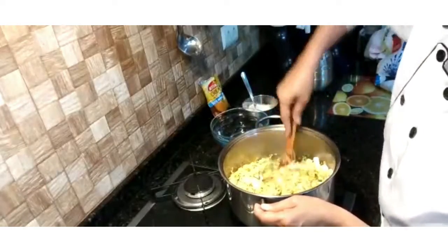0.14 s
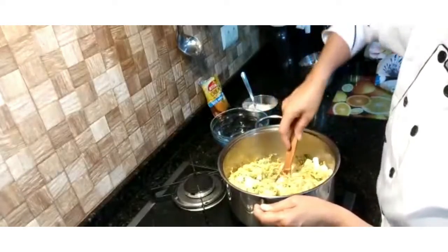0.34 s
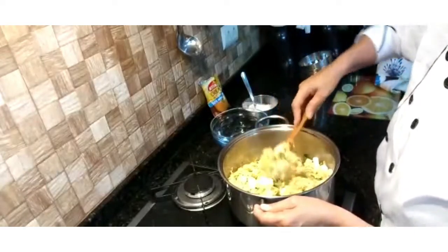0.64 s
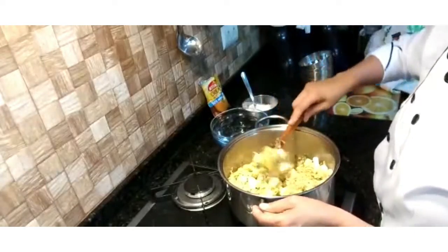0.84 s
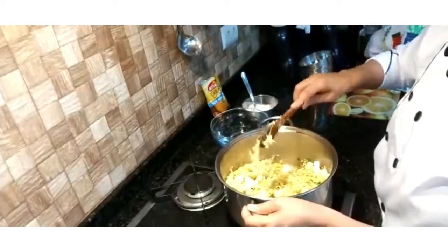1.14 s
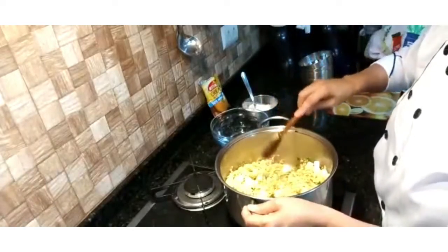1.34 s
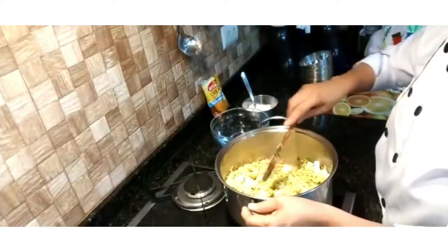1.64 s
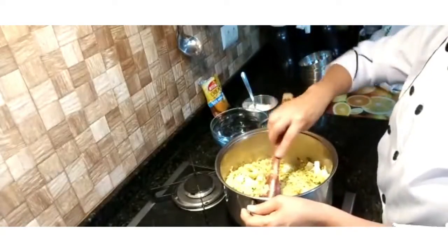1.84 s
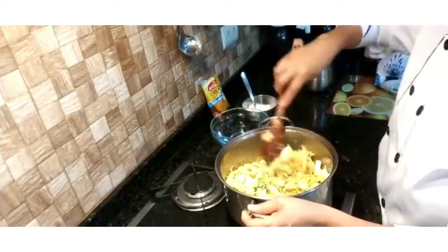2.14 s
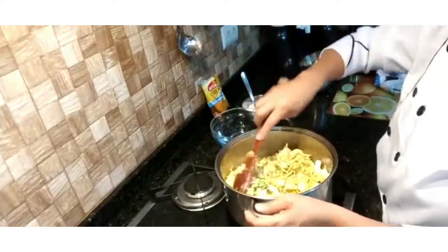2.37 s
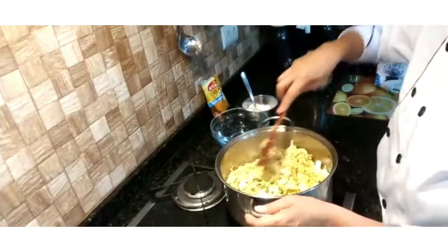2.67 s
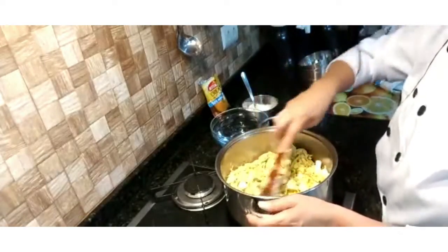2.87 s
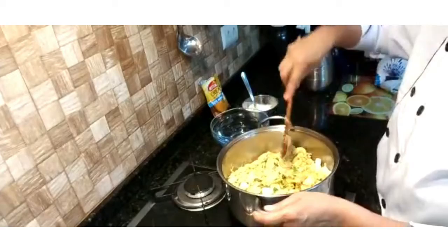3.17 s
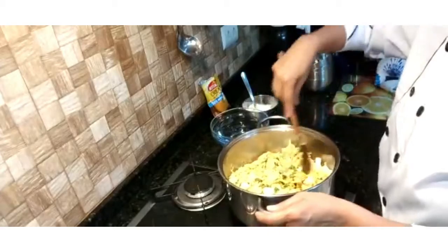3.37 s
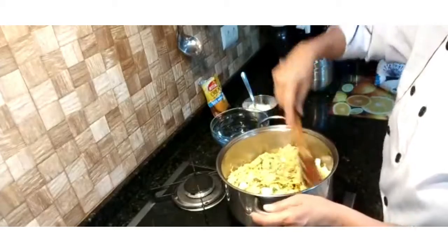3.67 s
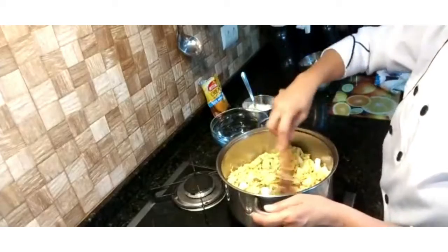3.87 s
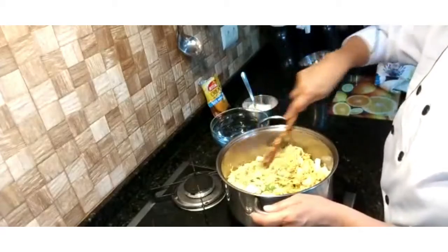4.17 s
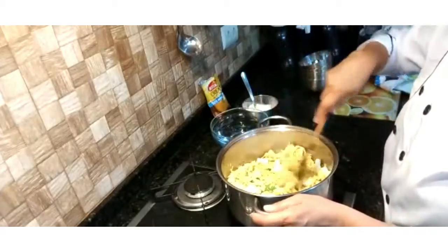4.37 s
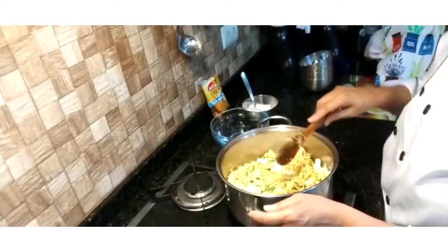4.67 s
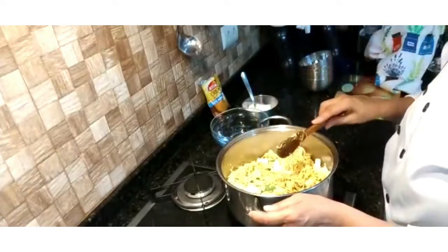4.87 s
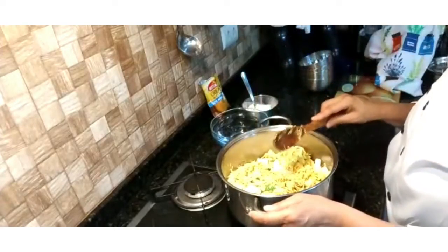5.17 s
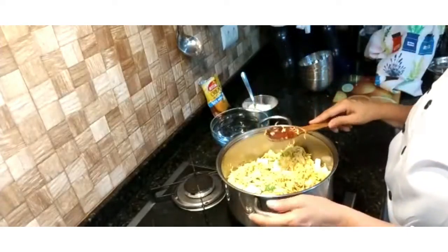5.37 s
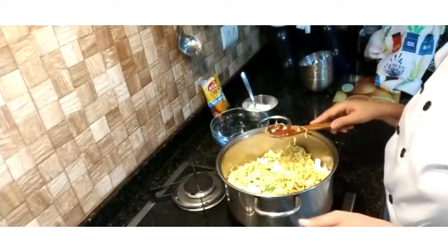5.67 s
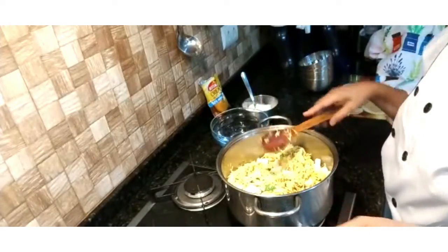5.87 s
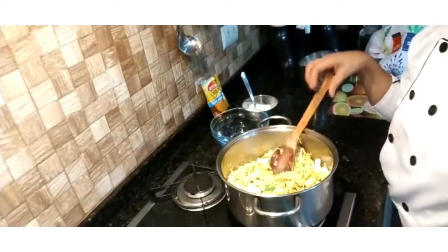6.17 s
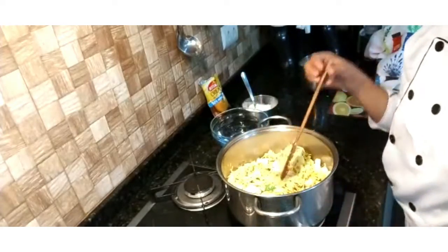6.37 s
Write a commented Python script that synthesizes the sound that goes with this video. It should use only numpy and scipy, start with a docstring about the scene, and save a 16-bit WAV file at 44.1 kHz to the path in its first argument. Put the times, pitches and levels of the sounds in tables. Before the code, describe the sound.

Close, slightly dull sound of cooking: soft squelch and a small tick at first, a pause, then solid damped knocks of wood on a heavy pot, spaced unevenly. Food crackles wetly and drops in soft lumps mid-way, another sharp knock rings briefly, then taps, and the end is quiet stirring over thin hiss with short room reverberation.

```python
"""A tiled kitchen, close to the stove: a wooden spoon turns food in a steel pot that a hand holds steady.
The spoon knocks on the wall: damped modes, a noise crack and a short clack ring in six bands.
Between knocks the food squelches and tumbles, made of coloured random grains and short noise pops.
Behind lie a faint sizzle of shaped noise with the hollow of the pot, and a low rumble of air."""
import sys
import numpy as np
from scipy import signal
from scipy.fft import rfft, irfft, next_fast_len
from scipy.io import wavfile
from scipy.ndimage import uniform_filter1d

SR = 44100
rng = np.random.default_rng(int(sys.argv[2]) if len(sys.argv) > 2 else 0)


def put_to_file(sound):
    """Save the sound as 16-bit audio at rate SR, in the file named by the first command-line argument."""
    columns = np.atleast_2d(sound).T  # one column per channel
    safe = np.clip(columns, -1, 1)
    whole_steps = np.round(safe * 32767)
    wavfile.write(sys.argv[1], SR, whole_steps.astype(np.int16))


N = 287644

# families of modes, in the order thump, base, wall, spoon, rim, tick: lowest f/Hz, highest f/Hz
MODE_FAMILIES = [(100, 440), (430, 790), (1010, 1690), (1690, 2750), (2850, 5200), (5200, 8600)]


def amp(db):
    """Decibels to gain."""
    return 10 ** (np.asarray(db) / 20)


def unit(x):
    """x at rms 1."""
    return x / np.sqrt(np.mean(x ** 2) + 1e-20)


def along(points, hz):
    """(f/Hz, value) points read on a logarithmic frequency axis."""
    f, value = np.transpose(points)
    return np.interp(np.log(hz + 1), np.log(f + 1), value)


def filtered(x, response):
    """x times a response of frequency."""
    m = next_fast_len(len(x) + SR // 2)
    gain = response(np.fft.rfftfreq(m, 1 / SR))
    return irfft(rfft(x, m) * gain, m)[:len(x)]


def coloured(x, spectrum):
    """x shaped by a spectrum of relative levels, at rms 1."""
    return unit(filtered(x, lambda hz: amp(along(spectrum, hz))))


def evened(x, width_hz):
    """A decaying burst with its chance peaks and dips of colour levelled out."""
    m = 2 * len(x)
    z = rfft(x, m)
    bins = max(int(width_hz * m / SR), 1)
    power = np.abs(uniform_filter1d(np.abs(z) ** 2, bins))
    return irfft(z / np.sqrt(power + 1e-12), m)[:len(x)] * np.linalg.norm(x)


def swell(middle_s, half_s):
    """A smooth bell-shaped rise and fall around a moment."""
    t = np.arange(N) / SR
    return np.exp(-((t - middle_s) / half_s) ** 2)


def grains(rate, spread_db):
    """Single-sample random impulses of uneven size, on average rate a second, at rms 1."""
    sizes = rng.standard_normal(N) * amp(spread_db * rng.standard_normal(N))
    present = rng.random(N) < rate / SR
    return unit(present * sizes)


def add(track, s, sound):
    """Mix a sound in at time s."""
    part = track[max(round(s * SR), 0):][:len(sound)]
    part += sound[:len(part)]


def kitchen(wall_db, tail_db):
    """Room response: the direct sound, quick echoes from pot and tiles, a diffuse tail."""
    # decay of the tail: f/Hz, t60/s
    decay = [(120, 0.34), (300, 0.57), (700, 0.34), (1800, 0.32), (4000, 0.31), (8000, 0.23)]
    hz, t, z = signal.stft(rng.standard_normal(SR // 2), SR, nperseg=256)
    fade_db = -60 * t / along(decay, hz)[:, None]
    tail = signal.istft(z * amp(fade_db), SR)[1][:SR // 2]
    t = np.arange(len(tail)) / SR
    tail = tail * (1 - np.exp(-t / 0.0016))  # the tail builds up behind the first echoes
    near = rng.standard_normal(len(t)) * (t / 0.002) * np.exp(-t / 0.0026)
    direct = t == 0
    return direct + amp(wall_db) * near / np.linalg.norm(near) + amp(tail_db) * tail / np.linalg.norm(tail)


def air(rumble_db=-49.0, draught_db=-38.5):
    """A low rumble of air around the stove, as low noise; one draught brushes the microphone."""
    # steady rumble: f/Hz, relative level/dB
    rumble_spectrum = [(12, 4), (25, -6), (45, -7), (70, -14.5), (130, -17), (200, -25), (320, -24.5),
                       (450, -29), (800, -26), (1600, -60)]
    puff_spectrum = [(12, -34), (25, -5.0), (38, 8), (55, -11.5), (100, -17), (400, -79)]  # same columns
    puff = coloured(rng.standard_normal(N), puff_spectrum)
    rumble = coloured(rng.standard_normal(N), rumble_spectrum)
    return amp(rumble_db) * rumble + amp(draught_db) * swell(middle_s=1.397, half_s=0.16) * puff


def sizzle(fizz_db=-7):
    """Moisture boils off the hot base: a slowly rising hiss with fizz in it; the pot's hollow sounds too."""
    # hiss of the base: f/Hz, relative level/dB
    hiss_spectrum = [(820, -36.5), (1400, -3.5), (1660, -1), (1790, -0.5), (4030, -2.5), (4400, 0.5),
                     (5160, -3.5), (5800, -1), (7330, -0.5), (7710, -2), (8000, -15), (10400, -3),
                     (17600, -120)]
    # resonances of the air in the open pot: f/Hz, width/Hz, relative level/dB
    resonances = [(610, 112, 14.5), (1040, 200, 14.5), (1870, 230, -6.5)]
    hiss_db, hiss_rise_db_per_s = -54.5, 0.14  # level at the start, and its rise as steam builds
    hollow_db, hollow_rise_db_per_s = -65, 1.03

    def cavity(f):
        """Sum of the resonances, each a second-order band-pass."""
        return sum(amp(db) * 1j * f * width / (centre * centre - f * f + 1j * f * width)
                   for centre, width, db in resonances)

    t = np.arange(N) / SR
    fizz = amp(fizz_db) * grains(rate=1500, spread_db=1.5)
    hiss = coloured(rng.standard_normal(N) + fizz, hiss_spectrum)
    hollow = unit(filtered(rng.standard_normal(N), cavity))
    hiss_gain = amp(hiss_db + hiss_rise_db_per_s * t)
    hollow_gain = amp(hollow_db + hollow_rise_db_per_s * t)
    return hiss_gain * hiss + hollow_gain * hollow


def food(pop_db=-5, pop_life_s=0.0012):
    """Pushed food drops in soft lumps and parts with small wet crackles, swelling with each stroke."""
    # tumbling lumps: f/Hz, relative level/dB
    lump_spectrum = [(90, -9.5), (165, 9.5), (330, -2.5), (750, -1.5), (900, -7), (1250, -10), (2000, -37),
                     (5000, -50)]
    # wet crackle: f/Hz, relative level/dB
    wet_spectrum = [(400, -15.5), (1150, -3), (2300, -5.5), (4000, -7), (8000, -11.5)]
    # spoon pushes through the food: middle t/s, half length/s, tumbling level/dB, squelch level/dB
    strokes = [(0.017, 0.12, -59, -48.5), (0.413, 0.16, -62, -62.5), (1.1, 0.085, -54, -57),
               (1.203, 0.033, -52, -54.5), (2.122, 0.091, -66, -55.5), (2.342, 0.057, -67, -59),
               (2.63, 0.086, -65.5, -56), (2.857, 0.16, -64, -72), (3.174, 0.062, -62.5, -59),
               (3.274, 0.022, -55, -49), (3.372, 0.039, -49, -54), (3.567, 0.069, -54, -53),
               (4.454, 0.036, -78, -53), (5.95, 0.12, -66.5, -66), (6.35, 0.23, -64.5, -56.5)]
    # wet pops in the food: t/s, level/dB before pop_db is added
    pops = [(2.1012, -28), (2.613, -33), (3.2704, -46), (3.5892, -30)]
    lumps = coloured(grains(rate=300, spread_db=2), lump_spectrum)
    crackle = coloured(grains(rate=1200, spread_db=2.5), wet_spectrum)
    close = np.zeros(N)
    for middle_s, half_s, lump_db, wet_db in strokes:
        close += swell(middle_s, half_s) * (amp(lump_db) * lumps + amp(wet_db) * crackle)
    burst = np.exp(-np.arange(SR // 20) / SR / pop_life_s)
    for s, db in pops:
        add(close, s, amp(db + pop_db) * rng.standard_normal(len(burst)) * burst)
    room = kitchen(wall_db=-23, tail_db=2.5)
    return signal.fftconvolve(close, room / np.linalg.norm(room))[:N]


def family_levels(strength_db, depth_db, contact_s, wood_db, favoured_hz, spot_lift_db=3):
    """Depth in the food adds thump, a long soft contact loses treble, and the spoon's wood clacks on its own."""
    # how readily each family answers a blow: level/dB, share of the depth that it gains
    answer = [(.5, 1), (1.43, 0.56), (-0.5, 0), (0, 0), (3, 0), (1.5, 0)]
    spoon_family = 3
    lo, hi = np.transpose(MODE_FAMILIES)
    answer_db, depth_share = np.transpose(answer)
    centre_hz = np.sqrt(lo * hi)
    softness_db = 10 * np.log10(1 + (centre_hz * contact_s) ** 4)
    # the struck spot also lifts the family of its favoured mode
    lift_db = spot_lift_db * ((lo <= favoured_hz) & (favoured_hz < hi))
    pot_db = answer_db + depth_share * depth_db - softness_db + lift_db
    return strength_db + np.where(np.arange(len(lo)) == spoon_family, wood_db, pot_db)


def knocks(crack_db=2, crack_t60=0.042, snap_db=4, snap_t60=0.017, clack_db=8, clack_t60=0.018,
           scatter_db=1.1, favour_db=14, favour_width=0.028):
    """Where the spoon lands decides how strongly each family of modes rings, and favours one mode."""
    # spoon on pot: t/s, strength level/dB, depth in the food/dB, contact time/s,
    # clack of the spoon's wood level/dB re strength, favoured mode f/Hz, ring length factor
    blows = [(0.015, -55, 8.5, 0.00012, 7, 205, 0.92), (0.179, -43, -8.5, .00003, 0, 1610, 0.63),
             (1.388, -31.5, 0, 0.00034, -16, 1220, 0.77), (1.610, -39, 2, 0.0004, -20, 3036, 1.17),
             (1.945, -40, -1, 0.00089, -21, 694, 1.1), (3.311, -50, 3.5, 0.0011, -12, 205, 1.1),
             (4.256, -33.5, -4.5, .00015, -12, 1071, 0.71), (4.868, -46.5, 1, 0.00058, -18, 711, 1.16),
             (4.970, -55.5, 4.5, 0.00023, -13, 1050, 1.1), (5.148, -48, 1, 0.00022, -12, 694, 0.85),
             (5.345, -38, -8, .00038, -14.5, 680, 1.3)]
    # modes of the filled pot and the spoon: f/Hz, relative level/dB, t60/s before the length factor
    pot_modes = [(135.4, -4.5, 0.15), (168.3, 1.5, 0.14), (205, -2, 0.18), (268, -2, 0.16),
                 (330, -2, 0.056), (394, 1.5, 0.1), (482, 6, 0.026), (540, 5.5, 0.026), (580, 3.5, 0.07),
                 (640.5, -6.5, 0.3), (694, -3.5, 0.13), (730, 0, 0.079), (1050, 5, 0.036),
                 (1128, -3.5, 0.069), (1250, 2, 0.029), (1360, -0.5, 0.034), (1563, -8, 0.17),
                 (1640, -8, 0.043), (2220, 3, 0.029), (2910, -2.5, 0.1), (3085, -1.5, 0.04),
                 (3330, -2.5, 0.039), (3424, 6, 0.037), (3860, -3.5, .06), (3987, -7.5, 0.081),
                 (4680, -3, 0.081), (5590, 5, 0.039), (6625, 6.5, 0.048), (7170, 2, 0.085)]
    out, t = np.zeros(N), np.arange(SR // 2) / SR

    def fade(t60):
        """Exponential decay by 60 dB in t60 seconds."""
        return np.exp(-np.log(1000) * t / t60)

    hz, mode_db, t60 = np.transpose(pot_modes)
    for s, strength_db, depth_db, contact_s, wood_db, favoured_hz, length in blows:
        levels = family_levels(strength_db, depth_db, contact_s, wood_db, favoured_hz)
        room = evened(kitchen(wall_db=-4, tail_db=-4.0), width_hz=66)
        # the pressing spoon and the shifting food detune the modes a little
        pitch = hz * (1 + 0.002 * rng.standard_normal(len(hz)))
        # favour_width is in natural log of frequency
        spot_db = favour_db * np.exp(-(np.log(hz / favoured_hz) / favour_width) ** 2)
        size = amp(mode_db + spot_db + scatter_db * rng.standard_normal(len(hz)))
        size = size * rng.choice([-1, 1], len(hz))
        modes = size[:, None] * np.sin(2 * np.pi * pitch[:, None] * t) * fade(length * t60[:, None])
        # countless damped modes blur into a crack that starts with the snap of contact
        envelope = amp(crack_db) * fade(length * crack_t60) + amp(snap_db) * fade(snap_t60)
        crack = evened(rng.standard_normal(len(t)) * envelope, width_hz=200)
        # the spoon's own heavily damped bending mode gives a short clack, its pitch set by the grip
        clack = amp(clack_db) * np.cos(2 * np.pi * favoured_hz * t) * fade(clack_t60)
        for (lo, hi), db in zip(MODE_FAMILIES, levels):
            band = signal.butter(N=3, Wn=[lo, hi], btype="band", fs=SR, output="sos")
            family = modes[(hz >= lo) & (hz < hi)].sum(0)
            ring = signal.sosfilt(band, family + 2 * crack + clack)
            heard = signal.fftconvolve(ring, room)[:len(t)]
            # a level is the family's whole energy spread over 40 ms
            add(out, s, amp(db) * heard / np.sqrt(np.sum(heard ** 2) / (0.04 * SR)))
    return out


def scene():
    """Everything as one close microphone hears it."""
    return (air() + sizzle() + food() + knocks())[None]


def record(dry):
    """The recorder's steep low-pass cuts what lies above its band limit."""
    top_hz = 8050
    low_pass = signal.cheby1(14, 0.2, top_hz, fs=SR, output="sos")  # order 14, ripple 0.2 dB
    return signal.sosfilt(low_pass, dry)


dry = scene()
out = record(dry)
put_to_file(out)
```